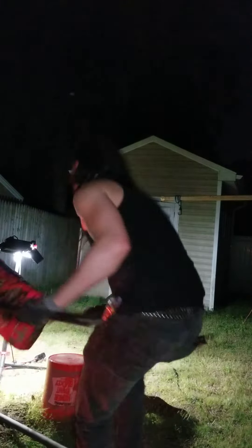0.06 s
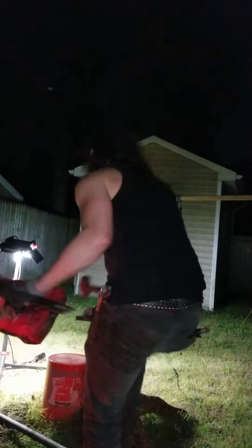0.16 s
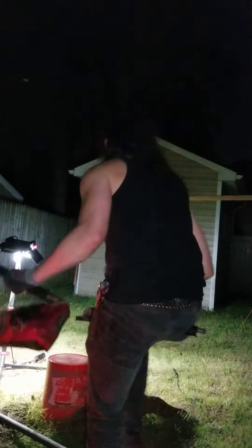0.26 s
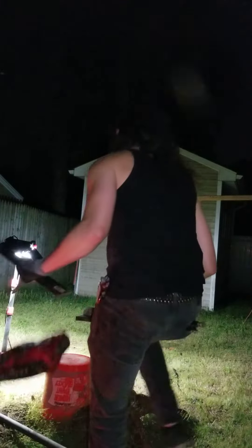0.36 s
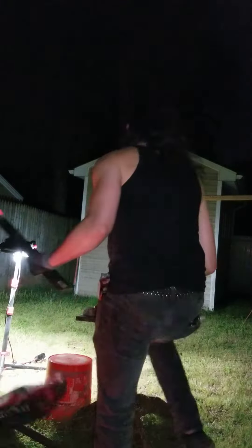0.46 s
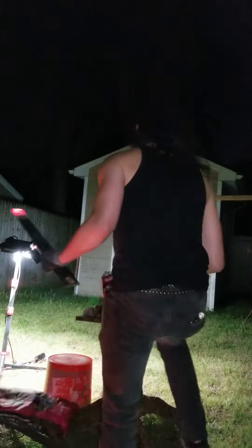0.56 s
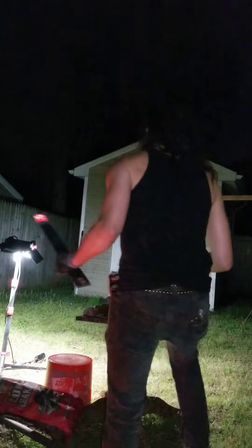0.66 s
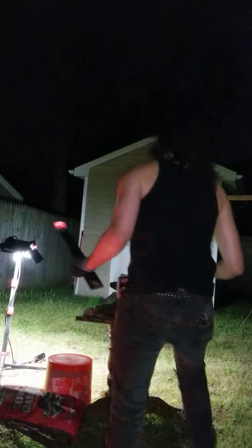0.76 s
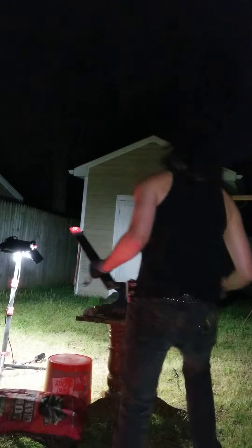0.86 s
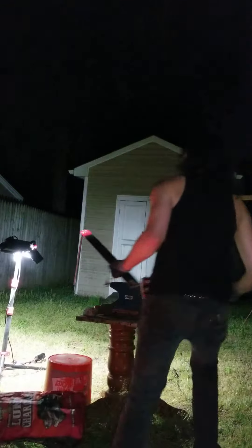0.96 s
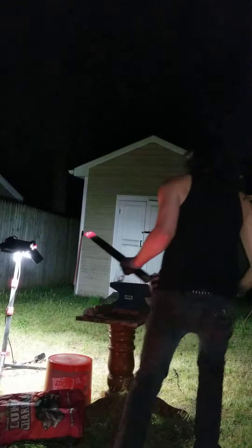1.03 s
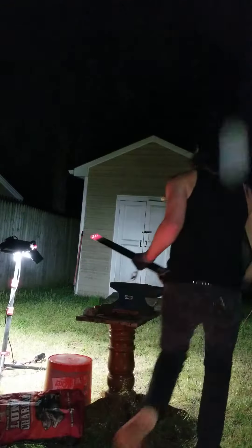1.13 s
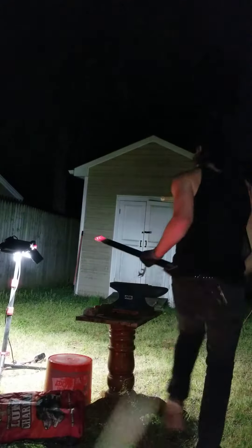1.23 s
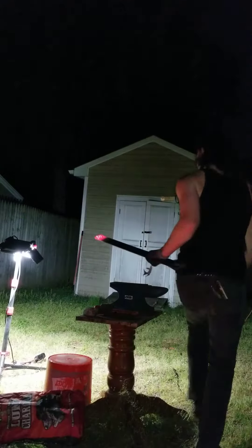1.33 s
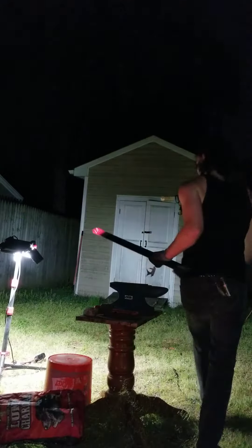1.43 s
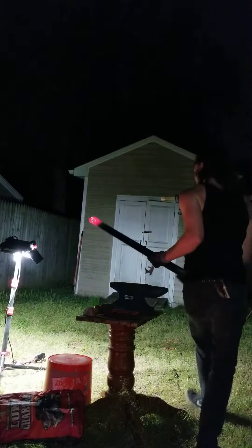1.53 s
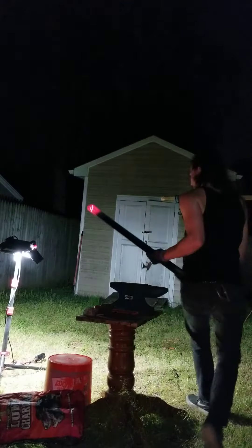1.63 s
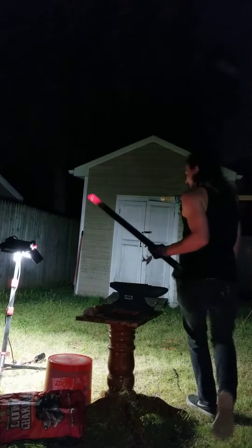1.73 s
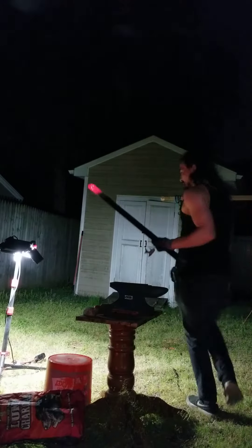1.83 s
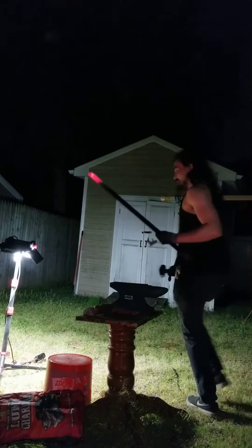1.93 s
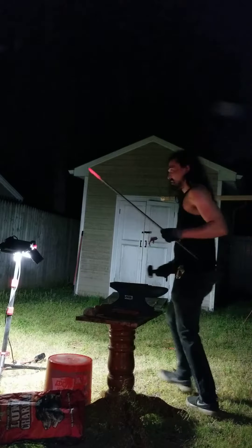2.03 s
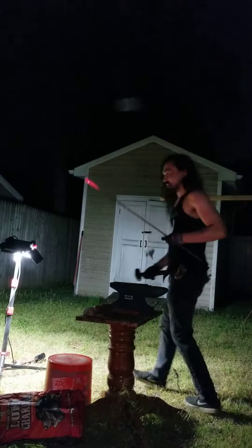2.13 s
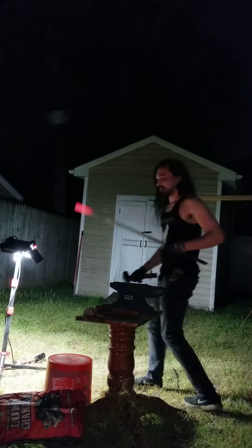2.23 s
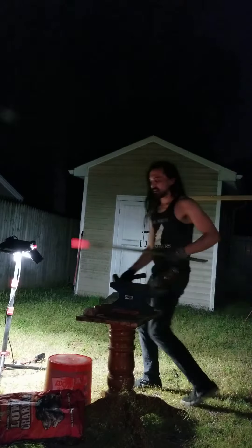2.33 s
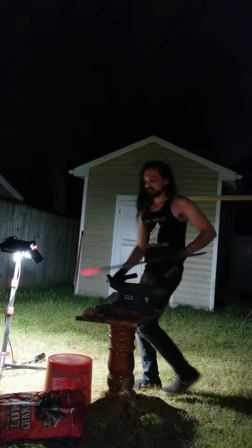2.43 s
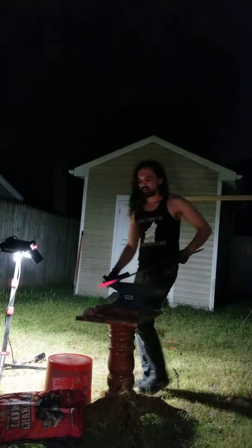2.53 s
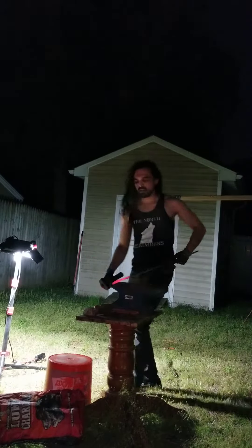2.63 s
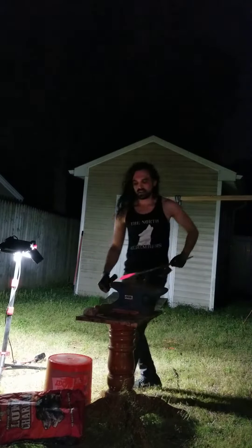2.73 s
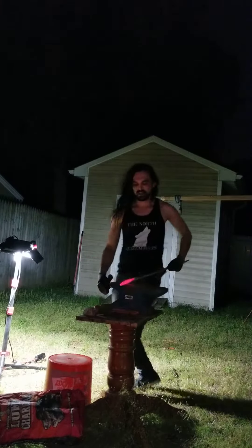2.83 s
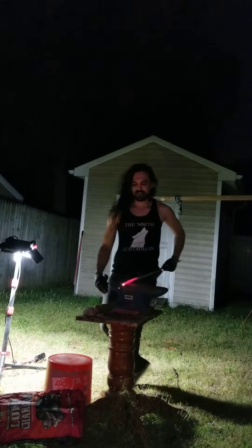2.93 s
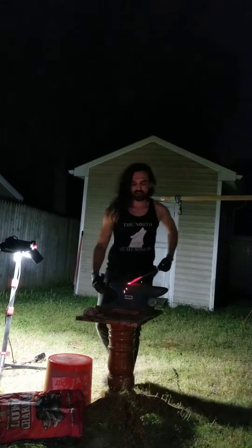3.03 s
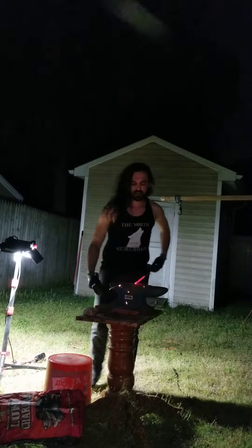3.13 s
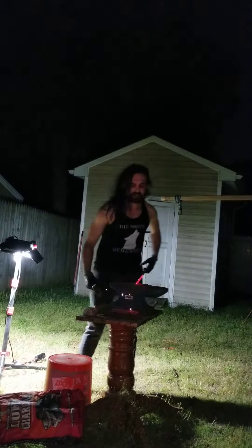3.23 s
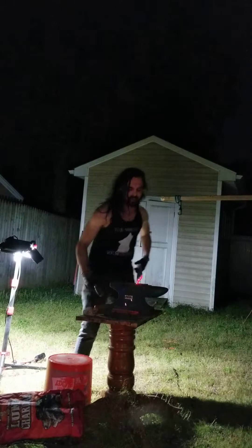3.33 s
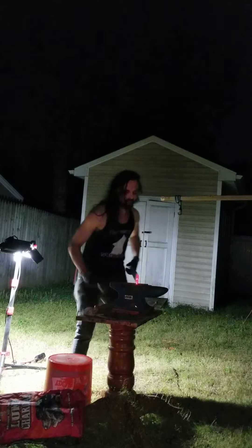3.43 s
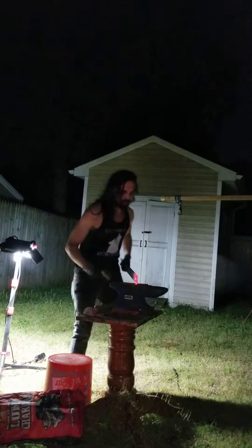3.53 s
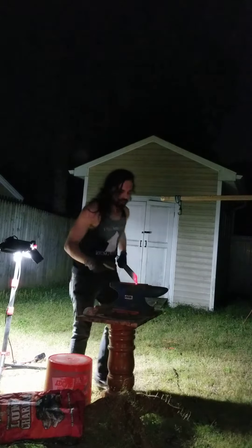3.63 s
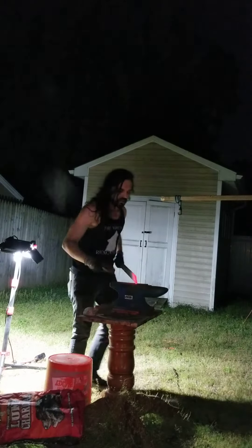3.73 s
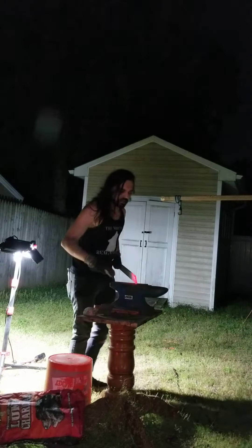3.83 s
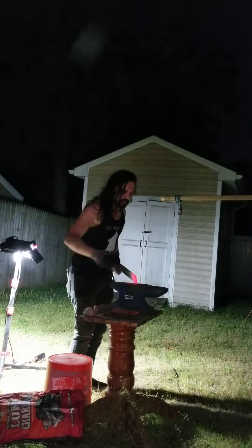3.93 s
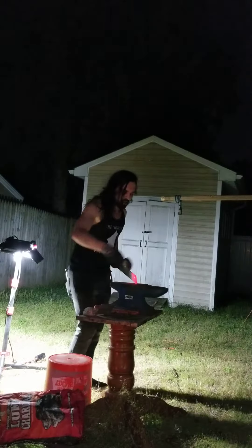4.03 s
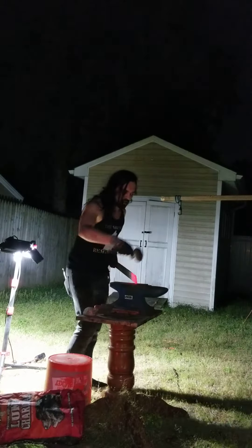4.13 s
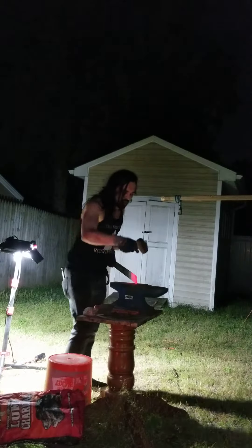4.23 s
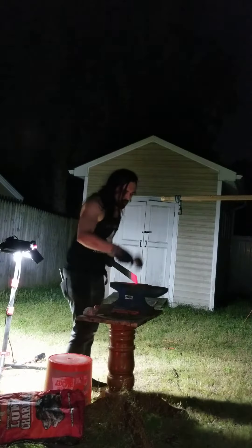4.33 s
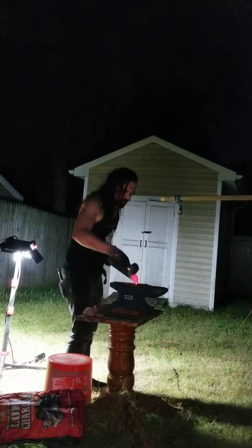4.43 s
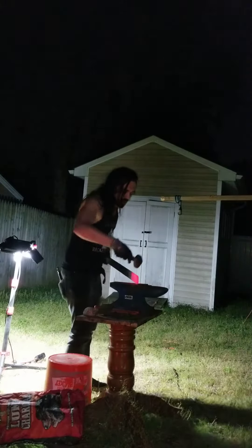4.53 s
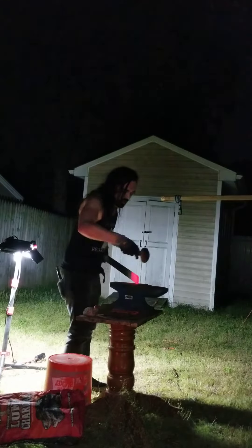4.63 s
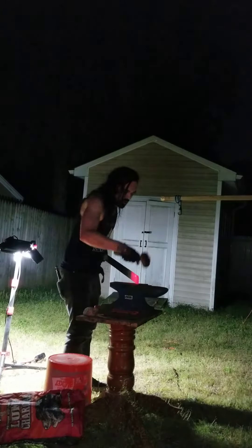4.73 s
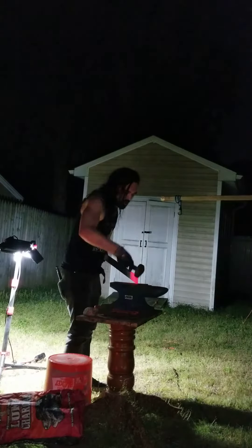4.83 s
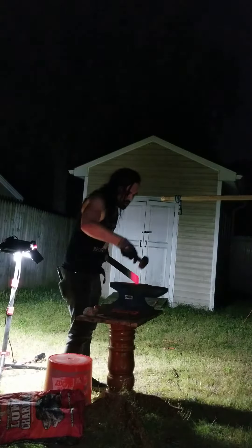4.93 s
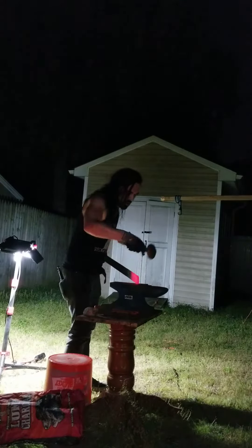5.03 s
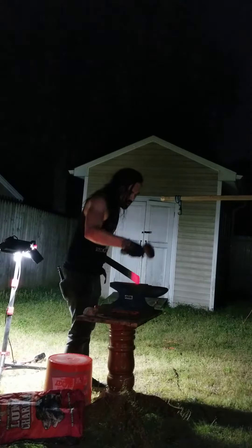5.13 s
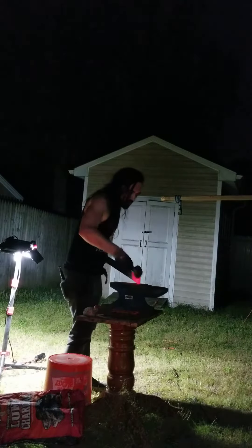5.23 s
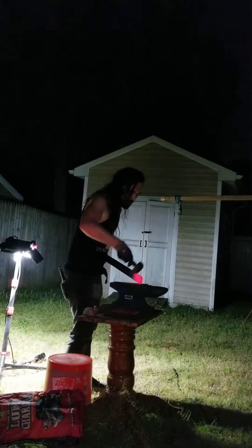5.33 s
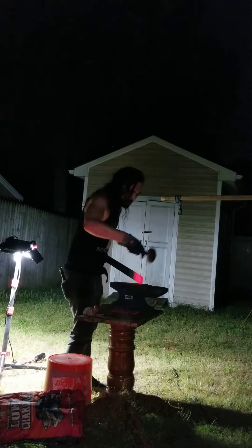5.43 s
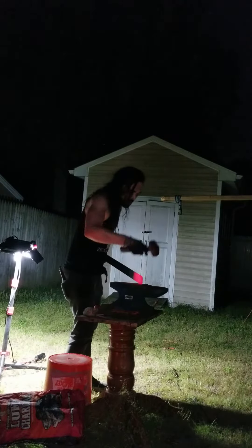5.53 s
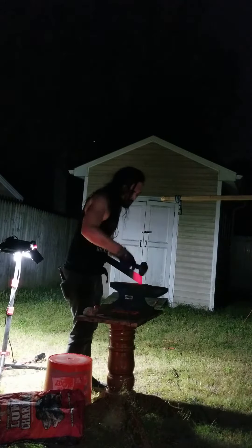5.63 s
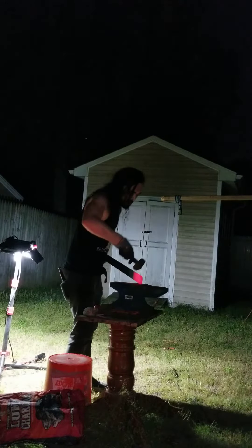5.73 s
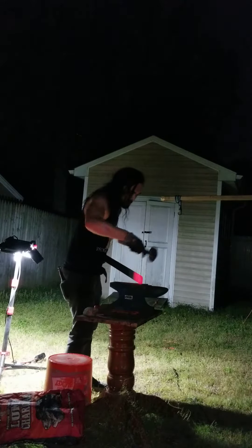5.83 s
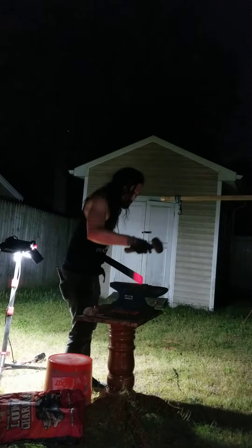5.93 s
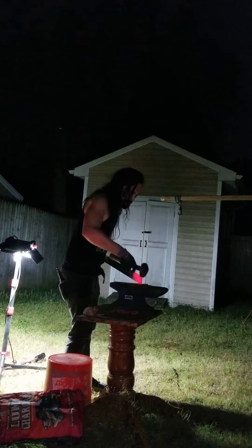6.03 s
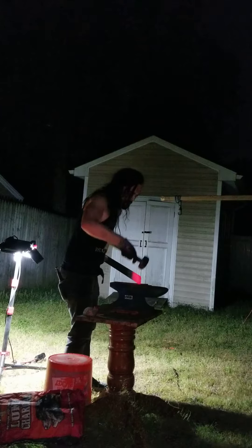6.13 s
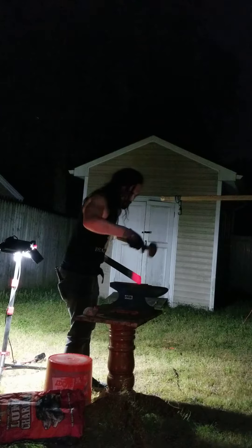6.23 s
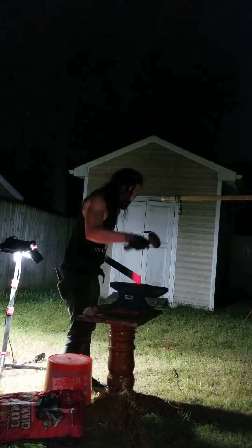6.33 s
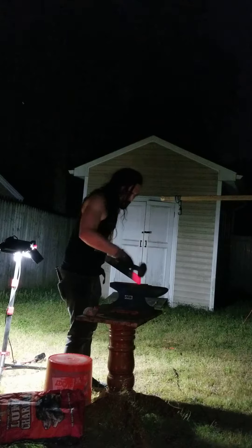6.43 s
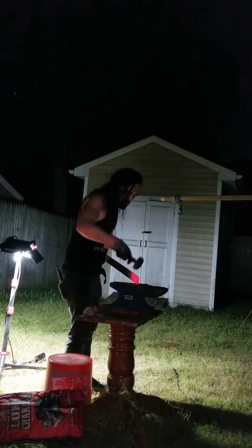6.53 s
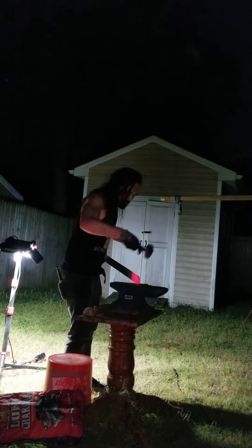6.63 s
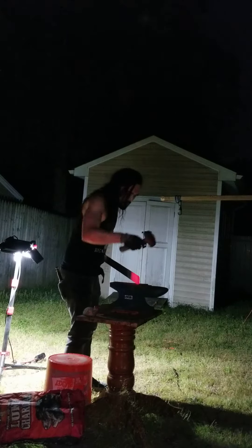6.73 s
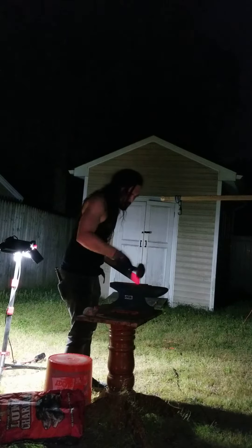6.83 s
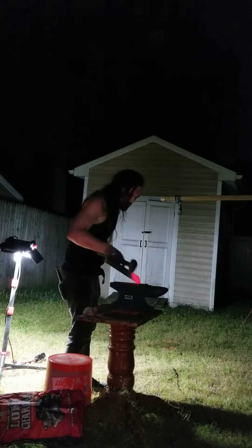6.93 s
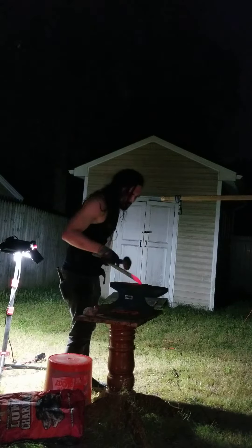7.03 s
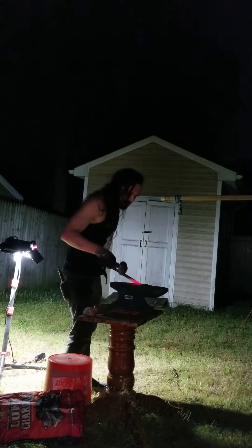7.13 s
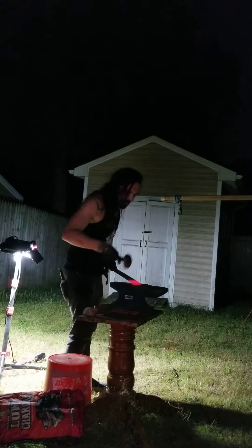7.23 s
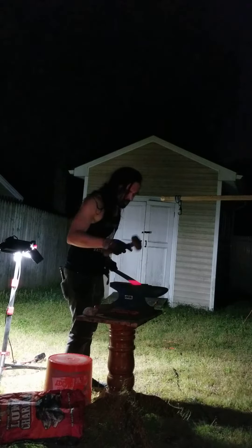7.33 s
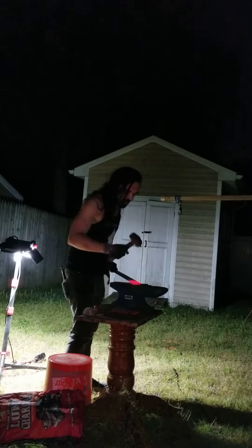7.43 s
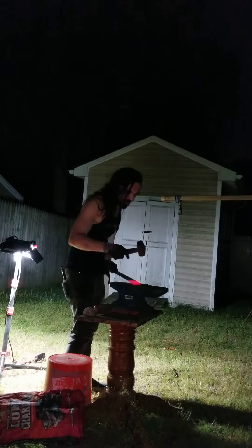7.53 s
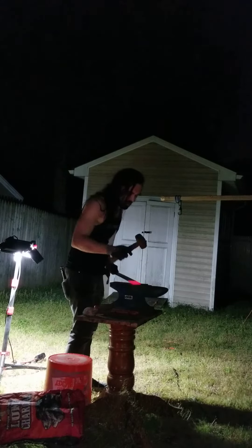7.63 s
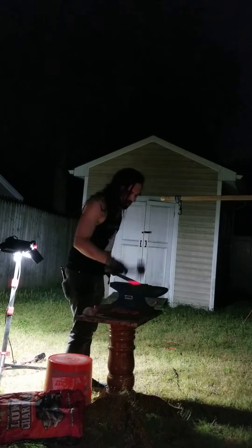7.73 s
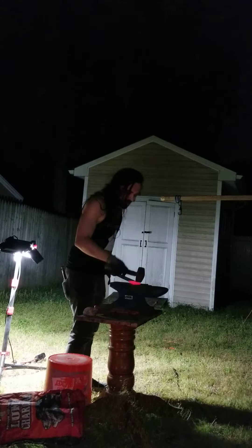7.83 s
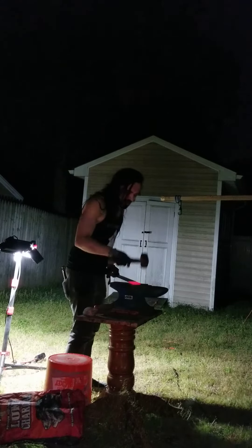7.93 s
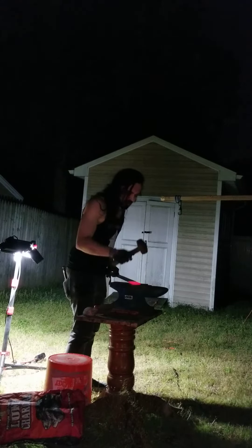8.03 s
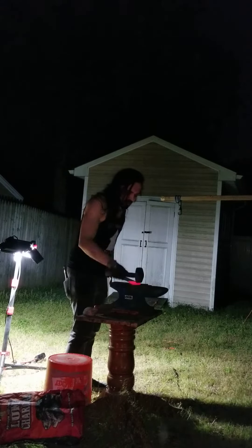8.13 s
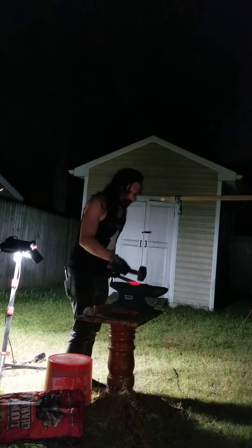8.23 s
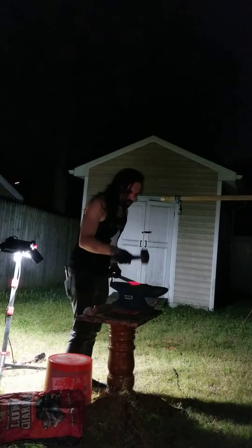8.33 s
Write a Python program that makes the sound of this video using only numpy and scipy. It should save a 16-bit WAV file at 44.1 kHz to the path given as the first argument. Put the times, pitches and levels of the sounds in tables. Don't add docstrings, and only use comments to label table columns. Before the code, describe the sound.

Forge blower drones while coals snap; a soft metal clink, then an even run of bright, clattering hammer blows on an anvil in a yard.

```python
import sys
import numpy as np
from scipy import signal
from scipy.fft import rfft, irfft, next_fast_len
from scipy.io import wavfile

SR = 44100
rng = np.random.default_rng(int(sys.argv[2]) if len(sys.argv) > 2 else 0)


def amp(db):
    return 10 ** (np.asarray(db, float) / 20)


def write(x):
    x = np.atleast_2d(x).T
    wavfile.write(sys.argv[1], SR, np.round(np.clip(x, -1, 1) * 32767).astype(np.int16))


N = 369114

# start_s, peak_db, brightness_db_per_octave, favoured_hz, muted_hz (both set by the landing spot)
BLOWS = [
    (2.8155, -19.5, 0.54, 2355, 4262),
    (4.3395, -13.5, -0.28, 1978, 5550),
    (4.765, -12, -1.2, 2530, 4262),
    (5.1878, -10.5, -1.9, 4262, 2800),
    (5.589, -9, -0.57, 2800, 8060),
    (5.997, -8, 0.56, 4262, 6680),
    (6.406, -7.5, -0.89, 3240, 1080),
    (6.809, -11, -0.74, 9000, 3000),
    (7.724, -7.5, 0.57, 1920, 5600),
    (8.0883, -8.5, 0.83, 8200, 5550),
]
FLAT_FROM_S = 7.5
SOFT_BELOW_DB = -17
FAVOUR_DB, FAVOUR_OCTAVES = 5.5, 0.069
MUTE_DB, MUTE_OCTAVES = -7, 0.11
SPOT_SPREAD_DB = 3
# pitch_hz, edge_level_db, flat_level_db, t60_s
ANVIL_MODES = [(219.4, -2, 8, 0.063), (675, 14.5, 11, 0.022), (1050, -6, -1.5, 0.12), (1604, -5, -14, 0.36),
               (1978, -3.5, -4, 0.26), (2370, -8.5, -11, 0.49), (2530, -2.5, -19, 0.132),
               (2795, -3.5, -12.5, 0.45), (2840, -2, -21, 0.23), (3260, -11, -2.5, 0.36),
               (3670, -10, -16, 0.31), (3737, -12.5, -17, 0.59), (4262, -12, -12, 0.35),
               (4600, -50, -11, 0.35), (4830, -15, -11, 0.34), (4861, -20, -16, 0.37),
               (5487, -20, -2.5, .3), (5544, -9.5, -11, 0.59), (5540, -39, -18, 0.29),
               (6080, -25, -7, 0.186), (6250, -12, -13, 0.31), (6800, -35, -17, 0.3),
               (7560, -24, -13.5, 0.2), (7640, -16, -29, .2), (8066, -8.5, -10, 0.22),
               (8150, -12.5, -11, 0.18), (8920, -16, -13, 0.2), (9150, -13, -12.5, 0.12),
               (10500, -17, -22, 0.23), (12200, -13, -25, 0.23)]
# pitch_hz, level_db_per_hz
BAR_CLATTER = [(180, -42), (300, 30), (1430, -4.5), (1580, -0.5), (2140, 0.5), (2790, -7.5), (3030, -5),
               (7820, -14.5), (16000, -22)]
# pitch_hz, t60_s
BAR_T60 = [(300, 0.041), (1500, 0.069), (4000, 0.13), (12000, 0.15)]
# pitch_hz, level_db, t60_s
CLINK = [(2355, -10, 0.23), (2200, 0, 0.027), (2800, -17, .25), (5030, -8, .03)]
KNOCK_HZ, KNOCK_T60_S, KNOCK_EDGE_DB, KNOCK_FLAT_DB = 1863, 0.0076, 4.5, -5
CRACK_EDGE_DB, CRACK_FLAT_DB = -19, -18
BOUNCE_EDGE_S, BOUNCE_EDGE_DB, BOUNCE_FLAT_S, BOUNCE_FLAT_DB = 0.064, -17, 0.037, -8
CHATTER_PER_S, CHATTER_DEPTH, CHATTER_BUILD_S, CHATTER_STEPS = 149.74, 1.18, 0.025, 64
BAR_MODES = 200
RING_T = np.arange(SR // 3) / SR
# delay_s, level_db, favoured_hz, favour_db, width_octaves
PATHS = [(0, -0.5, 1860, 0.5, 0.21), (.011, -9, 2600, 3.5, 0.96), (.022, -17, 8500, 13, 0.22),
         (.046, -17.5, 2730, 4.5, 0.36), (.064, -16.5, 4262, 17, .04), (.078, -19, 8200, 5, .1),
         (.115, -20.5, 3090, 3, 0.46)]
YARD_T60_S, YARD_DB = 0.2, -9.5

# pitch_hz, level_db, t60_s, swell_s
STAND_MODES = [(105, 4, .12, .022), (57, -12, .6, .03), (101, -15, .5, .05), (124, -17, .6, .05)]
GROUND_LAG_S, SHOCK_EDGE_DB, SHOCK_FLAT_DB = 0.0415, -16, -19
# start_s, level_db
FOOTFALLS = [
    (.002, -19),
    (.08, -32),
    (.135, -32),
    (.84, -41.5),
    (1.45, -38),
    (3.02, -36),
]
# start_s, level_db
RATTLES = [
    (6.543, -35),
    (6.946, -29),
    (7.799, -24.5),
    (7.818, -24.5),
    (8.166, -21.5),
    (8.184, -30),
    (8.205, -31.5),
]
RATTLE_HZ = 503

# start_s, peak_db
SNAPS = [(0.1554, -42), (0.189, -33), (0.2199, -35.5), (0.27, -21.5), (0.3875, -38), (0.4074, -42),
         (0.5003, -33), (0.6394, -44), (1.0806, -24), (1.168, -38), (1.219, -23.5), (1.544, -20),
         (2.0976, -31), (2.2842, -33), (2.4638, -30), (3.1213, -36), (3.2485, -32), (3.4285, -26),
         (3.5262, -31), (3.7389, -34), (3.9794, -33), (4.0044, -19), (4.1036, -33), (5.3567, -31),
         (5.8213, -25), (7.2055, -36), (7.4994, -39)]
SNAP_BODY_DB = -13
WOODY_SNAP_S, WOODY_DB = 1.08, 16
RUSTLE_S, RUSTLE_SPAN_S, RUSTLE_DB, RUSTLE_UNDER_DB = 0.548, 0.14, -31.5, -50
RUSTLE_RISE_DB_PER_S, RUSTLE_FALL_DB_PER_S = 400, 300

# start_s, level_db
BLOWER_LEVEL = [(0.0, -32), (0.6, -31), (0.95, -30.5), (4.0, -30), (5.0, -31.5), (5.6, -30), (6.55, -33.5),
                (7.9, -32.5), (8.37, -35)]
# multiple, left_db, right_db, flutter_db
BLADE_TONES = [(1, -5.5, -21, 0), (2, -0.6954, -16.5, -1), (3, -13.5, -31, 3), (4, -14, -31, 2.5),
               (5, -15.5, -26.5, 2.5), (6, -14, -28, -1), (7, -8, -29.5, 2.5)]
BLADE_HZ = 302.63
HUM_HZ, HUM_DB, HUM_RIGHT_DB = 119.77, -9.5, -35
# pitch_hz, level_db_per_hz
AIR_COLOUR = [(15, -62), (25, -15), (114, -8), (252, -13.5), (296, -14.5), (524, -11.5), (600, -18.5),
              (669, -9.5), (1680, -18), (2090, -9.5), (2400, -20.5), (3060, -24.5), (8370, -30.5),
              (15700, -35.5), (16500, -85)]
# pitch_hz, width_hz, level_db
HOUSING = [(124.7, 31, 5.5), (214, 62, 9), (734.4, 57, 4.5), (850, 21, 0), (1470, 280, 7), (2340, 640, 0),
           (3084, 470, 13), (3807, 740, 8), (5010, 380, 4.5), (8470, 560, 6.5)]
AIR_DB = -0.5

# pitch_hz, left_minus_right_db
COVER = [(60, 10), (110, 8), (200, 19.5), (380, 11.5), (700, 15), (1290, 6), (2380, 13.5), (4400, 12),
         (8120, 25.5), (15000, 33)]
# pitch_hz, share
LIKENESS = [(60, .5), (130, 0.61), (290, 0.67), (640, 0.3), (1400, 0.47), (3100, 0.32), (7000, 0.11),
            (15000, 0.13)]
PORT_LAG_S, ANVIL_LAG_S = -0.00012, -0.000052


def struck_modes():
    hz, edge_db, flat_db, t60 = np.transpose(ANVIL_MODES)
    bar_hz = (np.linspace(30, 125, BAR_MODES) + rng.uniform(-0.22, 0.22, BAR_MODES)) ** 2
    bar_db = table_at(BAR_CLATTER, bar_hz) + 5 * np.log10(bar_hz / 2000) - 6 + rng.normal(0, 2.3, BAR_MODES)
    bar_flat_db = bar_db - 0.5 + 1.1 * np.log2(bar_hz / 2000)
    bar_t60 = table_at(BAR_T60, bar_hz) * rng.uniform(0.43, 0.76, BAR_MODES)
    t60 = np.clip(np.append(t60, bar_t60), 0.01, 2)
    return np.append(hz, bar_hz), np.append(edge_db, bar_db), np.append(flat_db, bar_flat_db), t60


def chatter(count):
    step = np.arange(CHATTER_STEPS)
    joins = np.clip(1 - abs(RING_T * CHATTER_PER_S - step[:, None]), 0, 1).astype(np.float32)
    depth = CHATTER_DEPTH * np.minimum(step / CHATTER_PER_S / CHATTER_BUILD_S, 1)
    return 1 + (depth * rng.standard_normal((count, CHATTER_STEPS))).astype(np.float32) @ joins


def scale_crack(peak_db, bright, soft, flat):
    top_hz = 6000 if soft else 15000 if flat else 9000
    hiss = band(rng.standard_normal((2, len(RING_T))), 2, 1200, top_hz)
    level_db = peak_db + (CRACK_FLAT_DB if flat else CRACK_EDGE_DB) + 2 * bright
    return amp(level_db - 60 * RING_T / 0.35) * np.minimum(RING_T / 0.0018, 1) * hiss


def stump_thud(peak_db):
    return amp(peak_db - 18.5 - 60 * RING_T / 0.11) * 6 * band(rng.standard_normal(len(RING_T)), 2, 180, 800)


def yard_tail(blows):
    tail = rng.standard_normal((2, len(RING_T))) * amp(-60 * RING_T / YARD_T60_S) * np.minimum(RING_T / 0.002, 1)
    tail = amp(YARD_DB) * tail / np.sqrt(np.sum(tail ** 2, axis=1, keepdims=True))
    return signal.fftconvolve(blows, tail, axes=1)[:, :N]


def strikes():
    hz, edge_db, flat_db, t60 = struck_modes()
    decay = amp(np.maximum(-60 * RING_T / t60[:, None], -150))
    rings = (np.sin(2 * np.pi * np.outer(hz, RING_T)) * decay * np.minimum(RING_T / 0.0021, 1)).astype(np.float32)
    facing = rng.normal(0, 1.7, (2, len(PATHS), len(hz)))
    facing[:, 0] = 0
    knock = amp(-60 * RING_T / KNOCK_T60_S) * np.sin(2 * np.pi * KNOCK_HZ * RING_T)
    clink = sum(amp(db - 60 * RING_T / t60_s) * np.sin(2 * np.pi * f * RING_T) for f, db, t60_s in CLINK)
    clink = clink * np.minimum(RING_T / 0.004, 1)
    out = np.zeros((2, N + SR))
    for s, peak_db, bright, spot_hz, node_hz in BLOWS:
        flat, soft = s > FLAT_FROM_S, peak_db < SOFT_BELOW_DB
        level = peak_db - 12 + (flat_db if flat else edge_db) + bright * np.log2(hz / 2000)
        level += rng.normal(0, SPOT_SPREAD_DB, len(hz))
        if soft:
            level += -10 + bump(hz, 5000, 11, 0.25) * (t60 < 0.15) - 20 * (hz > 6800)
        level[len(ANVIL_MODES):] += rng.normal(0, 1.43, BAR_MODES)
        level += bump(hz, spot_hz, FAVOUR_DB, FAVOUR_OCTAVES) + bump(hz, node_hz, MUTE_DB, MUTE_OCTAVES)
        favour = 0.4 if flat else 1
        paths = np.array([db + bump(hz, f, favour_db * favour, octaves) for _, db, f, favour_db, octaves in PATHS])
        wavering = rings * chatter(len(hz))
        gains = amp(level + paths + facing) * rng.choice([-1, 1], facing.shape)
        heard = gains.astype(np.float32) @ wavering
        for k, (lag_s, *_) in enumerate(PATHS):
            add_at(out, s + lag_s, heard[:, k])
        bounce_s, bounce_db = (BOUNCE_FLAT_S, BOUNCE_FLAT_DB) if flat else (BOUNCE_EDGE_S, BOUNCE_EDGE_DB)
        add_at(out, s + bounce_s, amp(bounce_db - PATHS[1][1]) * heard[:, 1])
        add_at(out, s, scale_crack(peak_db, bright, soft, flat) + stump_thud(peak_db))
        contact_db = peak_db + (KNOCK_FLAT_DB if flat else KNOCK_EDGE_DB)
        add_at(out, s, amp(contact_db) * (clink if soft else knock))
    blows = out[:, :N]
    return blows + yard_tail(blows)


def stand():
    s, peak_db = np.transpose(BLOWS)[:2]
    shock_db = peak_db + np.where(s > FLAT_FROM_S, SHOCK_FLAT_DB, SHOCK_EDGE_DB)
    t = np.arange(SR // 2) / SR
    shake = np.zeros(len(t))
    for hz, db, t60, swell in STAND_MODES:
        shake += amp(db - 60 * t / t60) * (1 - np.exp(-(t / swell) ** 2)) * np.sin(2 * np.pi * hz * t)
    jolt_s, jolt_db = np.transpose(FOOTFALLS + RATTLES)
    pushes = spikes(s + GROUND_LAG_S, amp(shock_db + 7.5)) + spikes(jolt_s - 0.004, amp(jolt_db - 4))
    rattle_s, rattle_db = np.transpose(RATTLES)
    dips = spikes(rattle_s, -amp(rattle_db) * 1.45 * SR / RATTLE_HZ)
    dips = soften(soften(dips, RATTLE_HZ), RATTLE_HZ)
    return signal.fftconvolve(pushes, shake)[:N] + dips


def bag_rustle(sizes):
    since = np.arange(N) / SR - RUSTLE_S
    swell_db = RUSTLE_DB + np.minimum(RUSTLE_RISE_DB_PER_S * since, -RUSTLE_FALL_DB_PER_S * since)
    level = amp(np.maximum(swell_db, RUSTLE_UNDER_DB)) * (abs(since) < RUSTLE_SPAN_S)
    return band(level * sizes * (rng.random(N) < 5000 / SR), 1, 3500, 13000)


def coals():
    s, peak_db = np.transpose(SNAPS)
    sizes = amp(4.5 * np.minimum(rng.exponential(1, N), 3)) * rng.choice([-1, 1], N)
    crackle = amp(-48) * sizes * (rng.random(N) < 25 / SR)
    bright = spikes(s + 0.00068, amp(peak_db + 19)) + crackle
    bright = signal.sosfilt(signal.butter(2, 9000, "high", fs=SR, output="sos"), bright)
    body_db = peak_db + WOODY_DB * (abs(s - WOODY_SNAP_S) < 0.01) + SNAP_BODY_DB + 22
    body = band(spikes(s + 0.00053, amp(body_db)), 1, 3300, 6500)
    clicks = bright + body + bag_rustle(sizes)
    for delay_s, gain in [(0.0005, -0.088), (0.0021, 0.26)]:
        lag = round(delay_s * SR)
        clicks[lag:] += gain * clicks[:-lag]
    return clicks


def blade_tones():
    turn = 2 * np.pi * np.cumsum(BLADE_HZ * (1 + 0.00057 * drift(1.63))) / SR
    out = np.zeros((2, N))
    for k, left_db, right_db, flutter_db in BLADE_TONES:
        wobble = rng.uniform(0, 5.87) + 0.166 * flutter_db * drift(9.8)
        level = amp([[left_db], [right_db]] + flutter_db * drift(47))
        out += level * np.sqrt(2) * np.sin(k * turn + wobble + [[0], [0.3]])
    hum = 2 * np.pi * HUM_HZ * np.arange(N) / SR + 0.39 * drift(2.9)
    hum_level = amp([[HUM_DB], [HUM_RIGHT_DB]] + 2.92 * drift(15))
    return out + hum_level * np.sqrt(2) * np.sin(hum + [[0], [1.8]])


def air():
    size = next_fast_len(N)
    hz = np.arange(size // 2 + 1) * SR / size
    colour = table_at(AIR_COLOUR, hz)
    for f, width, db in HOUSING:
        colour += db / (1 + (2 * (hz - f) / width) ** 2)
    pair = irfft(rfft(rng.standard_normal((2, size))) * amp(colour), size)[:, :N]
    return amp(AIR_DB + 0.87 * drift(1.64)) * rms_one(pair)


def ports(near, scattered, lag_s=PORT_LAG_S):
    size = next_fast_len(N + 4096)
    hz = np.arange(size // 2 + 1) * SR / size
    alike = np.clip(table_at(LIKENESS, hz), 0, 1)
    mix = alike * rfft(near, size) * np.exp(-2j * np.pi * hz * lag_s)
    mix += np.sqrt(1 - alike ** 2) * rfft(scattered, size)
    return np.array([near, irfft(mix * amp(-table_at(COVER, hz)), size)[:N]])


def table_at(points, hz):
    points = np.array(points)
    return np.interp(np.log(np.maximum(hz, 1)), np.log(points[:, 0]), points[:, 1])


def bump(hz, centre_hz, db, octaves):
    return db * np.exp(-(np.log2(hz / centre_hz) / octaves) ** 2)


def band(x, order, low_hz, high_hz):
    return signal.sosfilt(signal.butter(order, [low_hz, high_hz], "band", fs=SR, output="sos"), x)


def soften(x, hz):
    r = np.exp(-2 * np.pi * hz / SR)
    return signal.lfilter([(1 - r) ** 2], [1, -2 * r, r * r], x)


def spikes(times, heights):
    out = 1e-18 * np.cos(np.arange(N))
    np.add.at(out, np.clip(np.round(np.asarray(times) * SR).astype(int), 0, N - 1), heights)
    return out


def add_at(out, start_s, sound):
    start = round(start_s * SR)
    out[:, start:start + sound.shape[-1]] += sound


def drift(rate):
    r = np.exp(-80 * np.pi * rate / SR)
    slow = signal.lfilter([1], [1, -2 * r, r * r], rng.standard_normal(N // 40 + 2002))[2000:]
    return np.interp(np.arange(N) / 40, np.arange(len(slow)), rms_one(slow))


def rms_one(x):
    return x / np.sqrt(np.mean(x ** 2) + 1e-20)


def curve(rows):
    return np.interp(np.arange(N) / SR, *np.transpose(rows))


def scene():
    blower = amp(curve(BLOWER_LEVEL)) * (blade_tones() + ports(*air()))
    snaps = coals()
    fire = ports(snaps, snaps) * amp([[0], [-6]])
    hammering = ports(*strikes(), ANVIL_LAG_S) * amp([[0], [3]])
    shaking = stand() * amp([[-16], [0]])
    return hammering + shaking + fire + blower


def top_cut(x):
    return signal.sosfilt(signal.butter(12, 16990, fs=SR, output="sos"), x)


def record(dry):
    dry = signal.sosfilt(signal.butter(2, 38, "high", fs=SR, output="sos"), dry)
    dry = signal.sosfilt(signal.cheby2(16, 34, 16000, fs=SR, output="sos"), dry)
    return top_cut(1.132 * np.tanh(dry / 1.084))


dry = scene()
out = record(dry)
write(out)
```